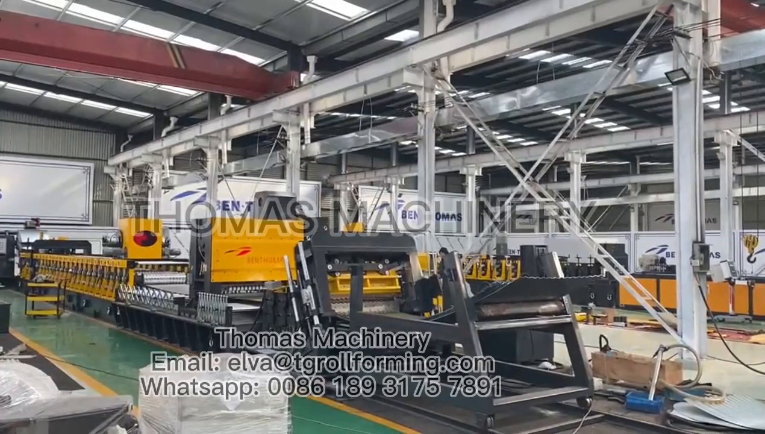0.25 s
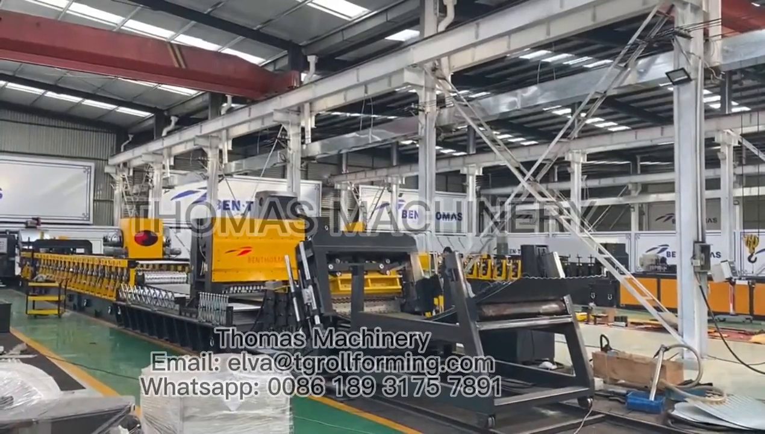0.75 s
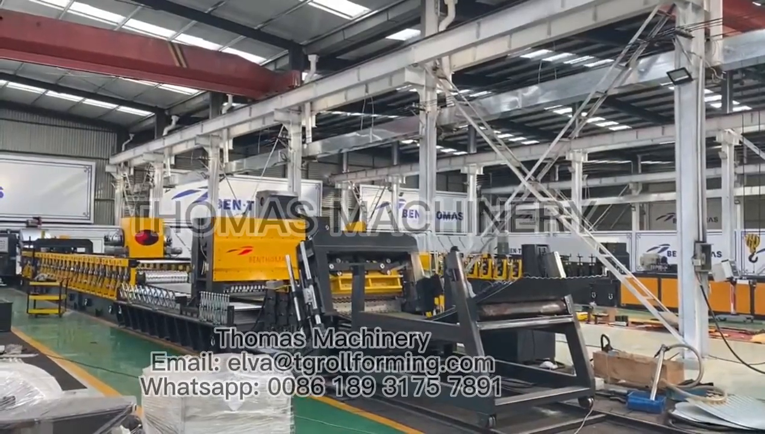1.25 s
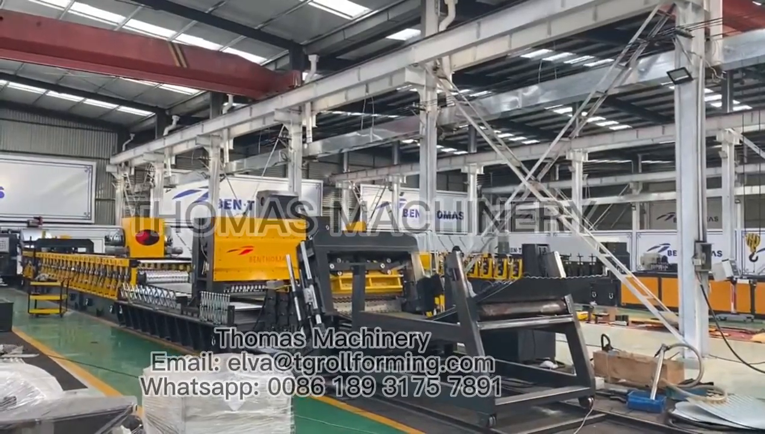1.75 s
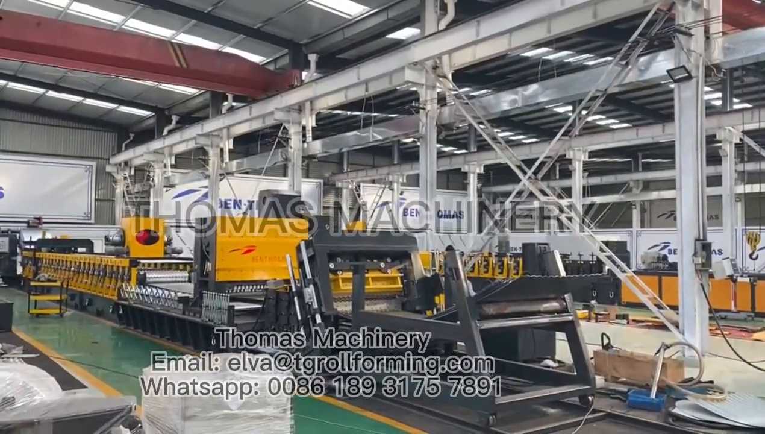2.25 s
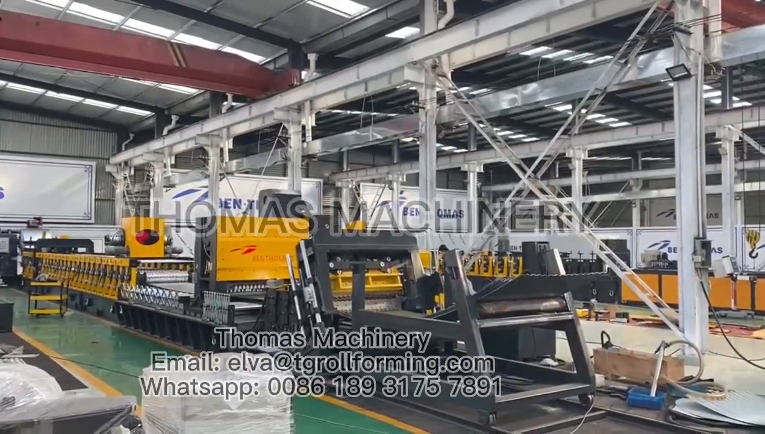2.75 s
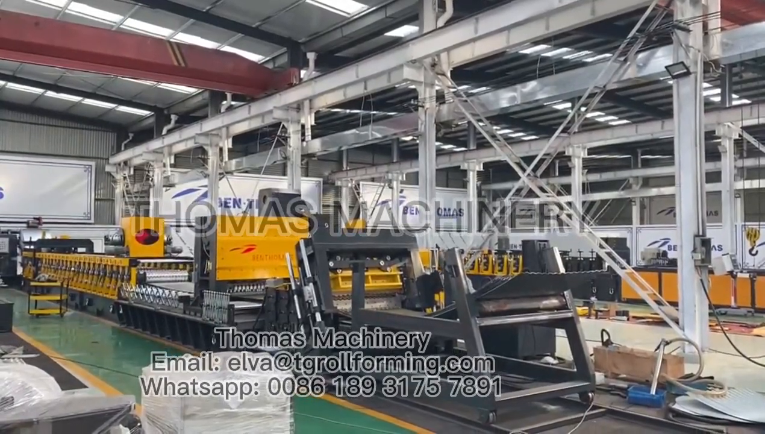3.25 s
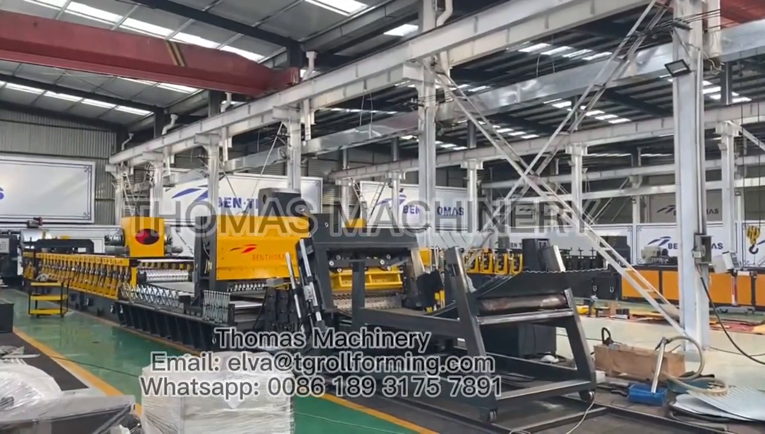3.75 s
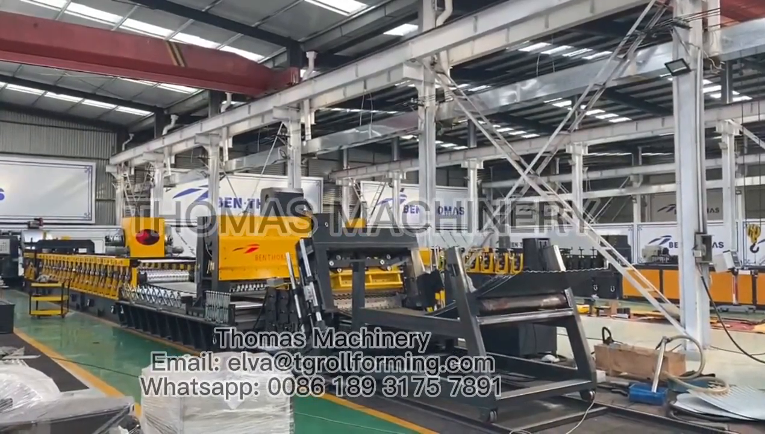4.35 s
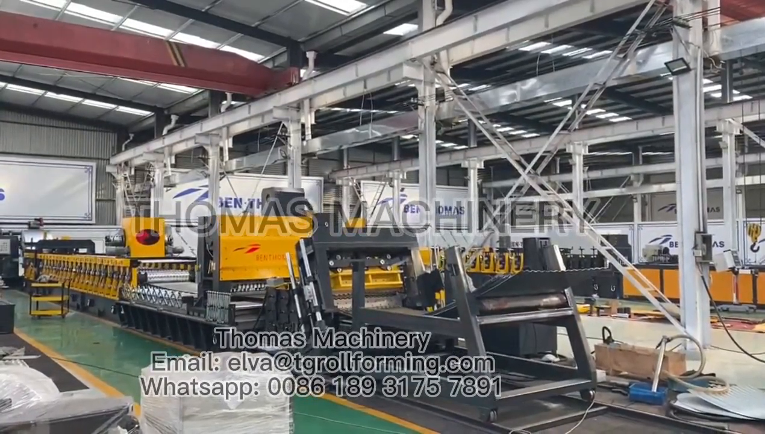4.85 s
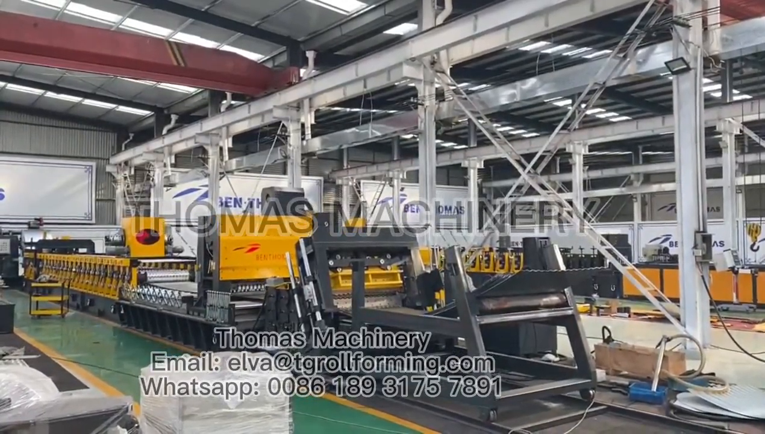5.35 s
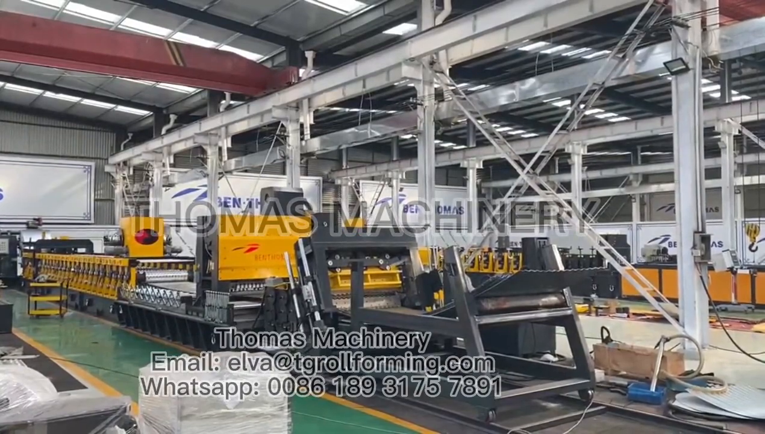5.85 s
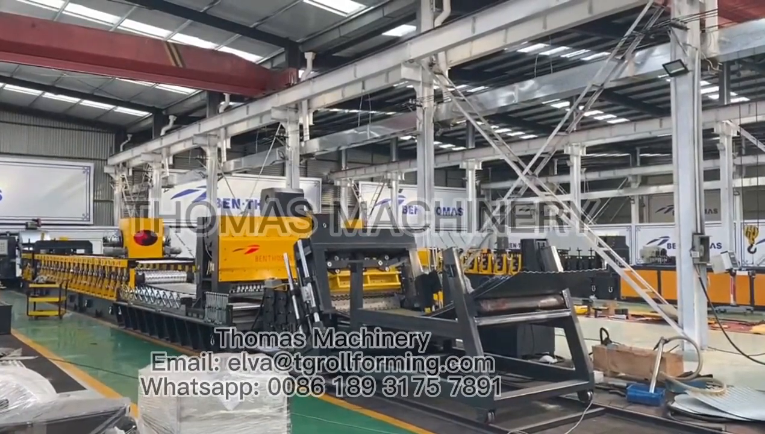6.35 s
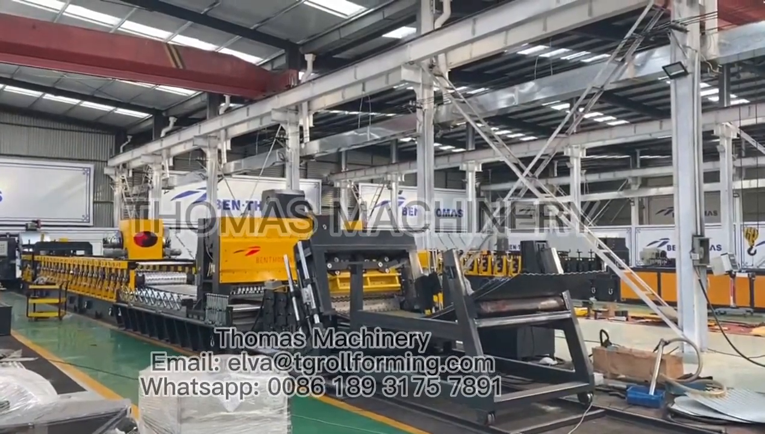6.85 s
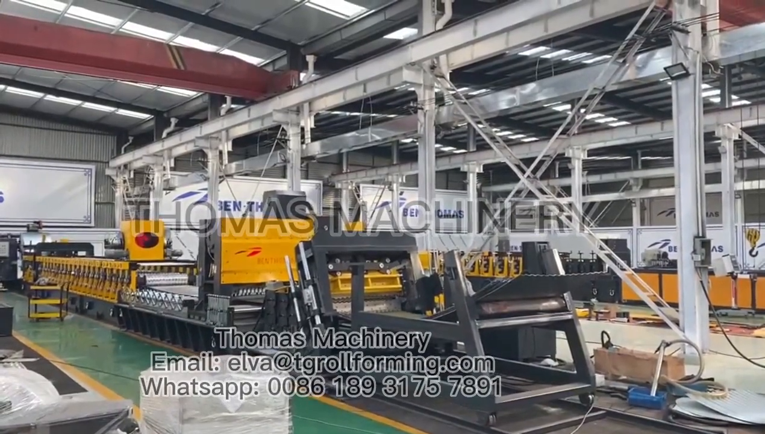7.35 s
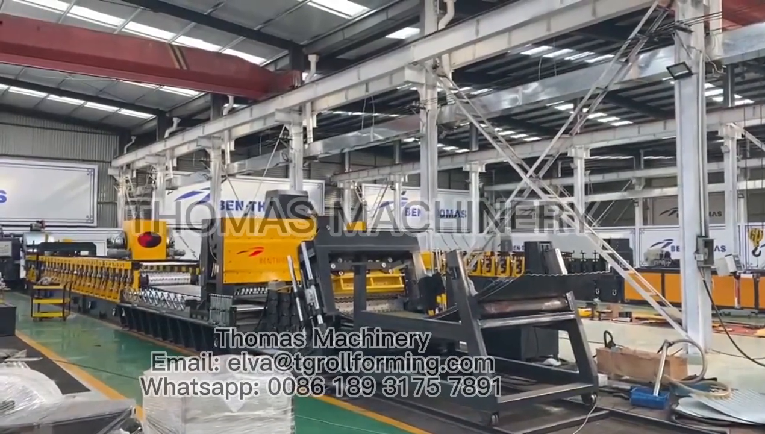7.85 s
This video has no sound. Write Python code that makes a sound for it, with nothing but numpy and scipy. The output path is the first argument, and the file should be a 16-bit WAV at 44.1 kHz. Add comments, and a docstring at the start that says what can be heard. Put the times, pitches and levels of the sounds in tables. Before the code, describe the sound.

A big echoing metal hall, stereo, at some distance from a forming line. Throughout, a hydraulic pump drones with slightly wavering low tones, a thin whine that weakens after the first seconds, fast pulsing oil hiss and broad low rumble. At the start, an earlier rattle of sheet steel is still dying away. At 0.73 s a valve clicks and briefly rings pipes, a clamp knocks at 0.88, and the press bites at 0.93 with a bright crunch, snap and deep thud. At 1.23 it releases with a clang; the long sheet slaps its rollers and shakes in a swelling, chattering, booming rush, fading over a second or more. The same cycle returns with bites near 3.08, 5.22 and 7.18 and releases near 3.38, 5.53 and 7.49, the last two clanging harder. Between strokes come a few dull knocks and soft steel drags, near 2.6 and 4.7. It ends around 8 s with the last rattle still fading.

```python
"""A steel factory hall with a roll forming line: steady tones and pulsing hiss make its hydraulic pump.
About every two seconds a valve clicks and rings its pipes, a clamp jolts the sheet, and the press bites with
a bright crunch and a thump, then knocks as it lets go; these are short bursts of noise and ringing steel.
The long steel sheet then shakes in a swelling rush of noise and small contacts that dies away."""
import sys
import numpy as np
from scipy import signal
from scipy.fft import rfft, irfft, next_fast_len
from scipy.io import wavfile
from scipy.ndimage import uniform_filter1d, minimum_filter1d, map_coordinates

SR = 44100
rng = np.random.default_rng(int(sys.argv[2]) if len(sys.argv) > 2 else 0)


def put_to_file(sound):
    """Save the sound as 16-bit audio at rate SR, in the file named by the first command-line argument."""
    columns = np.atleast_2d(sound).T  # one column per channel
    safe = np.clip(columns, -1, 1)
    whole_steps = np.round(safe * 32767)
    wavfile.write(sys.argv[1], SR, whole_steps.astype(np.int16))


N = 356352  # length of the scene in samples


def amp(db):
    """Decibels to gain."""
    return 10 ** (np.asarray(db) / 20)


def unit(x):
    """Scaled to rms 1."""
    return x / np.sqrt(np.mean(x ** 2) + 1e-20)


def along(points, hz):
    """(frequency [Hz], value) points read on a log frequency axis."""
    f, v = np.transpose(points)
    return np.interp(np.log(hz + 1), np.log(f + 1), v)


def clock():
    """The time of every sample, in seconds."""
    return np.arange(N) / SR


def curve(rows):
    """(time [s], value) rows as one value per sample."""
    return np.interp(clock(), *np.transpose(rows))


def wobble(rate):
    """A smooth random curve through `rate` random values a second."""
    knots = rng.standard_normal(int(N * rate / SR) + 4)
    return map_coordinates(knots, [clock() * rate])


def filtered(x, response):
    """x with each frequency multiplied by response(hz)."""
    size = next_fast_len(N + SR // 2)
    hz = np.fft.rfftfreq(size, 1 / SR)
    return irfft(rfft(x, size) * response(hz), size)[..., :N]


def noise(spectrum):
    """Two unrelated noises of one colour, rms 1."""
    white = rng.standard_normal((2, N))
    return unit(filtered(white, lambda hz: amp(along(spectrum, hz))))


def shifting(spectrum, depth_db, width_hz, life):
    """Coloured noise, rms 1, with resonances about width_hz wide that come and go in about `life` seconds."""
    hz, t, z = signal.stft(noise(spectrum), SR, nperseg=1024)
    place = np.meshgrid(hz / width_hz, t / life, indexing="ij")
    field = map_coordinates(rng.standard_normal((600, 700)), place, order=1)
    return unit(signal.istft(z * amp(depth_db * field), SR, nperseg=1024)[1][:, :N])


def burst(start, length, rise, fall):
    """A loudness shape: rises with time constant `rise`, holds, then falls by 60 dB in the time `fall`."""
    t = np.maximum(clock() - start, 0)
    return (1 - np.exp(-t / rise)) * amp(-60 * np.maximum(t - length, 0) / fall)


# how long the hall's echo takes to fall by 60 dB: (frequency [Hz], time [s])
HALL_DECAY = [(100, 2.3), (1000, 4.2), (4000, 1.5), (8000, 0.84), (14000, 0.6)]


def hall(x, wet_db):
    """x plus the hall's answer: a noise tail that builds up softly, then dies away, mostly treble first."""
    hz, t, z = signal.stft(rng.standard_normal((2, 3 * SR // 2)), SR, nperseg=256)
    decay = amp(-60 * t / along(HALL_DECAY, hz)[:, None])
    build_up = 1 - np.exp(-t / 0.021)
    tail = signal.istft(z * decay * build_up, SR, nperseg=256)[1]
    tail = tail / np.linalg.norm(tail[0])
    return x + amp(wet_db) * signal.fftconvolve(x, tail, axes=1)[:, :N]


# the hall's steady rumble: (frequency [Hz], relative density [dB])
DRONE = [(25, -48), (45, -14.5), (62, 0.5), (150, -2), (235, -3), (380, -3.5), (560, -8.5), (850, -9),
         (1200, -11.5), (2300, -21), (3400, -29), (5000, -28.5), (7500, -62), (10300, -37.5), (15500, -64)]
DRONE_DB = -29.5
# hiss of the oil: (frequency [Hz], relative density [dB])
OIL = [(1800, -46), (2850, 5), (3400, -9), (4250, -1.5), (4600, -5), (5050, 0.5), (6000, -8), (10000, -15),
       (14000, -26)]
# the pump's strongest tone, seven beats a turn: (time [s], level [dB])
PISTONS = [(0, -34), (.7, -32.5), (2.6, -35.5), (4.9, -32.5), (6, -46.5), (8.08, -35)]
PISTON_WAVER_DB, PISTON_DRIFT_RAD = 5.5, 0.59  # its unsteadiness in level and phase
# the pump's other tones: (multiple of the shaft rate [1], level [dB])
PUMP_TONES = [(4, -47), (8, -39), (9, -46), (11, -51), (12, -42), (14, -52), (15, -40), (16, -47),
              (17, -51.5), (18, -51.5), (21, -47.5), (27, -52.5), (37, -48.5)]
# a thin whine of the pump: (time [s], level [dB])
WHINE = [(0, -38.5), (.9, -37), (1.6, -40), (2.8, -42), (3.3, -43), (4.2, -54), (5.1, -44), (6, -52),
         (8.08, -52)]
# the hum of the drive motor: (frequency [Hz], level [dB])
MOTOR = [(133, -47), (266, -45.5)]
SHAFT_HZ = 24.9


def pump():
    """Turning parts make slightly unsteady tones and oil hisses in pulses, over the rumble of the hall."""
    turns = SHAFT_HZ * clock() + .003 * wobble(3)

    def tone(order, db, waver_db, drift):
        """A tone at `order` beats a turn, wavering in level and phase."""
        level = amp(db + waver_db * wobble(1.884))
        return level * np.sin(2 * np.pi * order * turns + drift * wobble(5))

    hum = tone(7, curve(PISTONS), PISTON_WAVER_DB, PISTON_DRIFT_RAD)
    hum = hum + sum(tone(order, db, waver_db=1.2, drift=0.25) for order, db in PUMP_TONES)
    whine_level = amp(curve(WHINE) + 0.96 * wobble(23))
    whine = whine_level * np.sin(2 * np.pi * 829 * clock() + 0.22 * wobble(24))
    motor = sum(tone(hz / SHAFT_HZ, db, waver_db=0.5, drift=1.0) for hz, db in MOTOR)
    tones = np.sqrt(2) * (hum + whine + motor)  # sqrt(2) makes the levels rms levels
    # the oil pulses two and four times a turn
    pulses = amp(0.95 * np.sin(4 * np.pi * turns) + np.sin(8 * np.pi * turns) + wobble(15.0))
    hiss = amp(-44 + 0.71 * wobble(3.72)) * pulses * noise(OIL)
    rumble = amp(DRONE_DB + 1.3 * wobble(6.3)) * noise(DRONE)
    return np.array([tones, np.zeros(N)]) + hiss + rumble


# the frame's rumble under load: (frequency [Hz], relative density [dB])
STRAIN = [(40, -27), (65, 4), (90, 2), (140, 5), (220, -33.5)]
STRAIN_DB, STRAIN_T60_S = -27, .3


def strain():
    """The loaded frame rumbles from each bite until the die lets go, then the rumble fades."""
    load = 0
    for bite, release in zip(BITES, RELEASES):
        load = load + burst(bite[0], release[0] - bite[0], rise=0.023, fall=STRAIN_T60_S)
    return amp(STRAIN_DB) * load * noise(STRAIN)


# loose knocks along the line, and the clamp's first touch:
# (time [s], level [dB], tick level relative to the knock [dB])
KNOCKS = [(.728, -28, -23), (0.884, -23.5, -31), (2.05, -27.5, -29), (2.63, -40, -1), (2.872, -30, -23),
          (3.031, -22, -18), (5.015, -28, -23), (5.167, -25.5, -32), (6.04, -23, -26), (6.955, -28, -21),
          (7.033, -32, -18), (7.122, -22.5, -28)]
KNOCK_T60_S = 0.19
# their dull sound: (frequency [Hz], relative density [dB])
KNOCK = [(60, -15), (200, 0), (400, 3), (620, -3), (1000, -0.5), (1400, -9), (2400, -20), (6000, -30)]


def knocks():
    """Loose parts knock as short dull noise, each with a bright tick of its own strength."""
    blows = [amp(db) * burst(s, 0.016, rise=0.0032, fall=KNOCK_T60_S) for s, db, _ in KNOCKS]
    ticks = sum(amp(tick_db) * blow for blow, (_, _, tick_db) in zip(blows, KNOCKS))
    return hall(sum(blows) * noise(KNOCK) + ticks * noise(CLASH), wet_db=-3.5)


# valve clicks: (time [s], level [dB])
VALVE = [(.725, -35.5), (2.861, -33.5), (5.005, -35), (6.95, -36)]
# pipes set ringing by each click: (frequency [Hz], level relative to the click [dB], 60 dB decay time [s])
PIPES = [(370.6, 8, 0.26), (864, 8, .25), (1183, -2, 0.18)]


def valve():
    """A short metallic click of noise that knocks on the pipes and makes their tones ring."""
    force = sum(amp(db) * burst(s, 0.03, rise=0.0033, fall=0.21) for s, db in VALVE)
    click = force * (amp(-4) * noise(CLASH) + amp(-2) * noise(CLANG))
    t = np.arange(SR // 2) / SR
    pipes = sum(amp(db - 60 * t / t60) * np.sin(2 * np.pi * hz * t) for hz, db, t60 in PIPES)
    pipes = pipes * (1 - np.exp(-t / 0.0029))
    for s, db in VALVE:
        click[0, round(s * SR):][:len(t)] += amp(db) * pipes
    return hall(click, wet_db=0)


# the sheet drags under the closed die and as it feeds forward: (time [s], level [dB], length [s])
DRAGS = [(0.971, -25, 0.052), (2.58, -44.5, 0.28), (3.1, -23.5, 0.07), (4.67, -38.5, 0.2),
         (5.25, -21.5, 0.064), (7.31, -29, 0.2)]
# rasp of dragging steel: (frequency [Hz], relative density [dB])
RASP = [(400, -46), (1200, 1), (1900, 1), (2350, -1.5), (2900, -4.5), (3600, -8.5), (6000, -16.5),
        (12000, -44)]


def drag():
    """Steel dragging on steel, a rough band of noise."""
    force = sum(amp(db) * burst(s, length, rise=0.012, fall=0.17) for s, db, length in DRAGS)
    roughness = amp(2.35 * wobble(90))
    return hall(roughness * force * noise(RASP), wet_db=-2.5)


# thuds of the frame and the sheet: (time [s], level [dB], pitch [Hz], 60 dB decay time [s])
THUDS = [(.945, -11, 124, .3), (.94, -24, 75.4, .4), (1.255, -16, 73, .3), (1.263, -17, 108, 0.28),
         (1.346, -14, 265.6, 0.41), (1.564, -17, 123, .2), (3.10, -12, 131, .3), (3.09, -20, 77.5, .5),
         (3.335, -16, 135, .3), (3.49, -11, 244, .23), (5.235, -21, 85, 0.34), (5.534, -15, 86, .25),
         (6.05, -16, 209.5, 0.35), (7.2, -17, 128.6, 0.56), (7.27, -17, 105, 0.25)]
THUD_RISE_S = 0.0059


def thuds():
    """Each thud is one heavy low mode, a decaying sine that reaches both ports alike before the hall answers."""
    sound = np.zeros(N)
    for s, db, hz, t60 in THUDS:
        sound += amp(db) * burst(s, 0, THUD_RISE_S, t60) * np.sin(2 * np.pi * hz * (clock() - s))
    return hall(np.array([sound, np.zeros(N)]), wet_db=-10.0)


# single steel parts clank: (time [s], level [dB], pitch [Hz], 60 dB decay time [s])
CLANKS = [(.945, -23, 5660, 0.25), (.985, -20, 2400, 0.26), (.995, -27, 3200, 0.29),
          (3.042, -18, 880, 0.17), (3.107, -22, 6940, 0.13), (3.11, -18, 6450, 0.12),
          (3.13, -20, 2350, .25), (3.135, -26.5, 4500, 0.29), (5.24, -23.5, 5950, 0.28),
          (5.27, -29, 4100, .35), (7.19, -24, 7200, 0.14), (7.211, -18, 9300, 0.11), (7.52, -18, 2400, .25)]
CLANK_WIDTH, CLANK_RISE_S = .06, .005  # the width is a share of the pitch


def clanks():
    """Each struck part rings briefly with a cluster of close modes, made as a narrow band of noise."""
    sound = np.zeros((2, N))
    t = np.arange(SR // 2) / SR
    hz = np.fft.rfftfreq(len(t), 1 / SR)
    for s, db, pitch, t60 in CLANKS:
        band = 1 / (1 + (2 * (hz / pitch - 1) / CLANK_WIDTH) ** 2)
        modes = unit(irfft(rfft(rng.standard_normal((2, len(t)))) * band, len(t)))
        shape = amp(db - 60 * t / t60) * (1 - np.exp(-t / CLANK_RISE_S))
        sound[:, round(s * SR):][:, :len(t)] += modes * shape
    return hall(sound, wet_db=-14)


# ringing of die and sheet: (frequency [Hz], relative level [dB], 60 dB decay time [s])
STEEL = [(848, 5, 1), (2318, 13, 0.13), (4300, -13, 0.32), (5609, -14, 0.6), (5978, -17, 0.36),
         (6472, -13, 0.57), (6800, -10, 0.55), (7204, -18, 0.76), (8136, -7, .3), (9674, -9, .45),
         (10159, 10, 0.44)]


def ring(force):
    """The steel's modes, decaying sines driven by a noisy scraping force."""
    t = np.arange(SR) / SR
    modes = sum(amp(db - 60 * t / t60) * np.sin(2 * np.pi * hz * t) for hz, db, t60 in STEEL)
    modes = modes / np.linalg.norm(modes)
    return signal.fftconvolve(force * rng.standard_normal((2, N)), modes[None], axes=1)[:, :N]


# the die bites: (time [s], crunch level [dB], crunch length [s], snap level [dB], snap delay [s],
# thump level [dB], thump length [s])
BITES = [(0.932, -22.5, 0.06, -20, 0.02, -21, 0.028), (3.083, -20.5, 0.049, -23, 0.0061, -22, 0.038),
         (5.225, -21, 0.042, -27, 0.003, -26, 0.036), (7.176, -25, 0.036, -19, 0.025, -14.5, 0.04)]
# the die lets go and the freed sheet shakes: (time [s], clash level [dB], clang level [dB], thump level [dB],
# blow length [s], rattle level [dB], boom level [dB], swell time constant [s], rattle 60 dB decay time [s])
RELEASES = [(1.23, -28, -23.5, -25, 0.083, -17.5, -17, 0.055, 2.6),
            (3.38, -28.5, -19.5, -22, 0.097, -17, -19.5, 0.041, 2.17),
            (5.526, -23.5, -14, -23, 0.036, -18, -19.5, 0.013, 2.37),
            (7.485, -22.5, -14.5, -24, 0.042, -20, -26, 0.02, 4)]
# the crunch of a bite: (frequency [Hz], relative density [dB])
CRUNCH = [(300, -28), (900, -6), (1500, 3.5), (2000, 9), (2400, -2.5), (3200, 1), (4600, 1.5), (7000, 4.5),
          (9500, 6.5), (11000, -4), (15500, -7)]
# the snap of steel giving way: (frequency [Hz], relative density [dB])
SNAP = [(2000, -24), (4500, -14), (6500, -10), (8000, 6), (10200, -3), (11500, 1), (15500, -9)]
# bright clash of steel edges: (frequency [Hz], relative density [dB])
CLASH = [(300, -28), (1500, -2.5), (4500, 1.5), (7000, 1.5), (10000, 0), (12000, -6), (15500, -8.5)]
# duller clang of the heavy parts: (frequency [Hz], relative density [dB])
CLANG = [(80, -15), (250, 13), (600, -4), (1200, -19), (2200, -5), (4000, -10), (9000, -52)]
# low thump of the frame: (frequency [Hz], relative density [dB])
THUMP = [(25, -37), (50, -8), (80, -4.5), (140, 3), (220, -54), (500, -19), (1500, -31.5)]


def press():
    """Each bite and each release is a cluster of slips that rings the steel and thumps the frame."""
    slips = amp(1.95 * wobble(130))
    bite = slips * sum(amp(db) * burst(s, length, rise=.006, fall=.2) for s, db, length, *_ in BITES)
    # the die scrapes on the sheet just before it bites, and the steel gives way with a snap just after
    scrape = sum(amp(db - 13.0) * burst(s - .045, 0.038, rise=0.016, fall=0.046) for s, db, *_ in BITES)
    snap = sum(amp(db) * burst(s + delay, .009, rise=.003, fall=.05) for s, _, _, db, delay, _, _ in BITES)

    clash, clang = 0, 0
    thump_blows = [(s, db, length) for s, *_, db, length in BITES]
    for s, clash_db, clang_db, thump_db, length, *_ in RELEASES:
        clash = clash + slips * amp(clash_db) * burst(s, length, rise=0.026, fall=0.26)
        # the heavy parts answer later than the edges that touch
        clang = clang + amp(clang_db) * burst(s + 0.014, length, rise=0.019, fall=0.23)
        thump_blows.append((s, thump_db, length))
    thump = sum(amp(db) * burst(s + 0.0094, length, rise=0.0039, fall=0.4) for s, db, length in thump_blows)

    def steel(spectrum):
        """Noise with the quickly changing resonances of struck steel."""
        return shifting(spectrum, depth_db=4.5, width_hz=150, life=.025)

    edges = (bite + scrape) * steel(CRUNCH) + clash * steel(CLASH) + snap * steel(SNAP)
    ringing = ring(bite + snap + clash)
    frame = clang * noise(CLANG) + thump * noise(THUMP)
    return hall(amp(0.6) * edges + amp(-12.5) * ringing, wet_db=-2.5) + hall(amp(-1.5) * frame, wet_db=-5)


# the shaking sheet slaps the rollers again: (time [s], level [dB], length [s])
SURGES = [(1.328, -22, 0.047), (1.44, -26, .05), (1.559, -24.5, 0.077), (3.473, -19, 0.059),
          (3.69, -25, 0.079), (5.554, -15, .025), (7.513, -16.5, .03), (7.758, -23.5, 0.077)]


def surges():
    """Each slap on the rollers is a short dense rattle over a boom of the sheet, both of noise."""
    force = sum(amp(db) * burst(s, length, rise=0.013, fall=0.3) for s, db, length in SURGES)
    force = amp(2.4 * wobble(110)) * force
    return hall(force * (noise(RATTLE) + amp(-3.0) * noise(BOOM)), wet_db=-8.5)


CLATTER_PER_S, CLATTER_T60_S = 20, .09  # contacts a second at each spot, and their ring time
CLATTER_LOW_HZ, CLATTER_HIGH_HZ = 448.6, 3003  # range of the modes, before a small random detuning


def clatter(count=6, size=16):
    """Irregular hard contacts on rollers at several spots of the sheet, each ringing briefly; rms 1."""
    t = np.arange(SR // 8) / SR
    sound = np.zeros((2, N))
    for _ in range(count):
        detune = np.exp(0.0599 * rng.standard_normal(size))
        hz = np.geomspace(CLATTER_LOW_HZ, CLATTER_HIGH_HZ, size) * detune
        modes = rng.standard_normal((2, size)) @ np.sin(2 * np.pi * hz[:, None] * t)
        modes = modes * amp(-60 * t / CLATTER_T60_S)
        contacts = (rng.random(N) < CLATTER_PER_S / SR) * rng.uniform(0.47, 1, N)
        sound += signal.oaconvolve(contacts[None], modes, axes=1)[:, :N]
    return unit(sound)


# the clamp comes down on the sheet ahead of each bite:
# (time [s], rattle level [dB], boom level [dB], rattle swell time constant [s])
CLAMPS = [(0.88, -24, -25.5, 0.016), (3.03, -23.5, -25, 0.014), (5.17, -21.5, -22, 0.03),
          (7.12, -26, -22, 0.03)]
CLAMP_HOLD_S, CLAMP_T60_S, CLAMP_BOOM_T60_S = 0.068, 1.25, 3.1
JOLT_DB, JOLT_BOOM_DB, JOLT_HOLD_S, JOLT_T60_S = -4, 8, 0.03, 0.4  # levels relative to the valve click
IDLE_RATTLE_DB, IDLE_BOOM_DB = -46.5, -38  # the sheet trembles between strokes
RUN_DELAY_S = 0.0043  # the sheet starts to shake just after the die lets go
SLAM_DB, SLAM_T60_S = -6, 0.31  # the sheet's first slap on the rollers, relative to the clang
RATTLE_HOLD_S, BOOM_HOLD_S, BOOM_T60_S = 0.31, 0.3, 2.4
EARLIER_AGO_S, EARLIER_DB, EARLIER_T60_S = 0.69, -12, 1.52  # an earlier stroke is still dying away


def shaking():
    """How hard the sheet rattles and booms: jolted by the valve, struck by the clamp, then running free."""
    rattle = [amp(IDLE_RATTLE_DB + 1.5 * wobble(3.6))]
    boom = [amp(IDLE_BOOM_DB + 2.1 * wobble(6.6))]
    for s, db in VALVE:
        jolt = amp(db) * burst(s, JOLT_HOLD_S, rise=0.0055, fall=JOLT_T60_S)
        rattle.append(amp(JOLT_DB) * jolt)
        boom.append(amp(JOLT_BOOM_DB) * jolt)
    for s, rattle_db, boom_db, swell in CLAMPS:
        rattle.append(amp(rattle_db) * burst(s, CLAMP_HOLD_S, swell, CLAMP_T60_S))
        boom.append(amp(boom_db) * burst(s, CLAMP_HOLD_S, rise=0.03, fall=CLAMP_BOOM_T60_S))
    for s, _, clang_db, _, length, rattle_db, boom_db, swell, t60 in RELEASES:
        start = s + RUN_DELAY_S
        rattle.append(amp(clang_db + SLAM_DB) * burst(start, length, rise=0.0076, fall=SLAM_T60_S))
        rattle.append(amp(rattle_db) * burst(start, RATTLE_HOLD_S, swell, t60))
        boom.append(amp(boom_db) * burst(start, BOOM_HOLD_S, swell, BOOM_T60_S))
    earlier = burst(-EARLIER_AGO_S, RATTLE_HOLD_S, rise=.04, fall=EARLIER_T60_S)
    rattle.append(amp(EARLIER_DB) * earlier)
    # the separate shakings add in power
    return np.linalg.norm(rattle, axis=0), np.linalg.norm(boom, axis=0)


# rattle of the sheet: (frequency [Hz], relative density [dB])
RATTLE = [(200, -38), (450, 3), (900, 5), (1300, 3.5), (2100, -3), (3100, -12), (4000, -15), (5300, -19),
          (6500, -24), (10000, -30.5), (15000, -118)]
# boom of the flexing sheet: (frequency [Hz], relative density [dB])
BOOM = [(25, -47), (45, -10), (70, -1), (130, -2.5), (240, 3.5), (350, -1.5), (520, -6), (900, -55)]
CLATTER_DB, SCRAPE_DB = -8, -14  # hard contacts and rasp on the guides, relative to the rattle


def sheet():
    """The sheet booms as it flexes and chatters on the rollers; harder shaking rings brighter."""
    rattle, flex = shaking()
    rattle = rattle * amp(0.32 * wobble(18))
    # countless close plate modes ripple the spectrum, while broader resonances shift as the sheet bends
    ripple = list(zip(np.arange(0, SR, 14), rng.standard_normal(SR)))
    plate = shifting(RATTLE, depth_db=2.5, width_hz=70, life=.05)
    plate = unit(filtered(plate, lambda hz: amp(1.56 * along(ripple, hz))))
    rush = rattle * (amp(-0.7 + 0.87 * wobble(55)) * plate + amp(CLATTER_DB) * clatter())
    # small taps on the rollers, about 300 a second, grow with the square of the shaking
    taps = (rng.random(N) < 300 / SR) * rng.random(N)
    chatter = unit(signal.lfilter([1], [1, -np.exp(-1 / (0.02 * SR))], taps))
    bright = amp(2.5) * chatter * rattle ** 2 * shifting(CLASH, depth_db=4, width_hz=110, life=.04)
    boom = flex * amp(0.76 * wobble(20)) * noise(BOOM)
    scrape = rattle * amp(SCRAPE_DB + 3.3 * wobble(70)) * noise(RASP)
    return rush + scrape + boom + hall(bright, wet_db=-25)


# how far the two ports are in step, from 1 (in step) to -1 (opposed), clipped to that range when used:
# (frequency [Hz], likeness [1])
ALIKE = [(100, .99), (350, 0.88), (780, 0.1), (1300, 0.55), (2150, 0.7), (3000, 0.5), (4100, 0.8),
         (5100, 0.12), (6400, 0.76), (7600, 0), (8550, -1.15), (9200, -0.05), (9800, 1.5), (10800, 1.5),
         (11400, -1.7), (12700, -0.7), (13350, 1), (14600, 2.5), (15350, -7)]
# how much louder the left is: (frequency [Hz], level difference [dB])
TILT = [(60, -1.5), (120, -1.5), (240, -3), (480, -1.0), (950, 3.5), (1890, 3), (3770, 3), (7520, 0),
        (15000, 0)]
# how far the left leads: (frequency [Hz], phase [rad])
LEAD = [(100, 0.046), (600, 0.26), (1400, -1.07), (2800, 0.76), (4000, 1), (5200, -0.35), (6400, 0.34),
        (15000, 0)]


def ports(field):
    """Two microphone ports set apart share the first part of the sound and hear the second in opposition."""
    def share(hz):
        """The gains of the common and the opposed part."""
        angle = np.arccos(np.clip(along(ALIKE, hz), -.995, .995)) / 2
        return np.array([np.cos(angle), np.sin(angle)])

    common, apart = filtered(field, share)
    sides = np.array([[.5], [-.5]])  # left and right each take half the difference

    def balance(hz):
        """The level and phase of each side."""
        return amp(sides * along(TILT, hz)) * np.exp(1j * sides * along(LEAD, hz))

    return filtered(np.array([common + apart, common - apart]), balance)


def scene():
    """The whole line in its hall, from the background to the sheet, heard at the two ports."""
    background = pump() + strain() + knocks() + valve()
    stroke = drag() + thuds() + clanks() + press()
    return ports(background + stroke + surges() + sheet())


TOP_HZ = 15600  # band limit


def record(dry):
    """A limiter turns both sides down around the loudest peaks; then everything above the band limit is cut."""
    ceiling = .8
    needed = np.minimum(1, ceiling / (np.abs(dry).max(axis=0) + 1e-9))
    gain = uniform_filter1d(minimum_filter1d(needed, size=200), size=200)
    return filtered(dry * gain, lambda hz: hz < TOP_HZ)


dry = scene()
out = record(dry)
put_to_file(out)
```